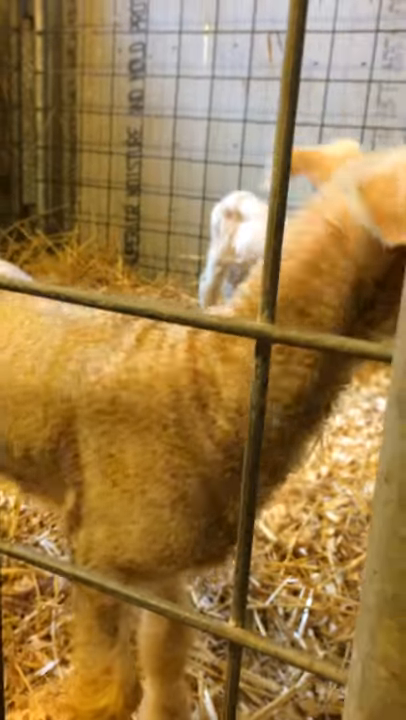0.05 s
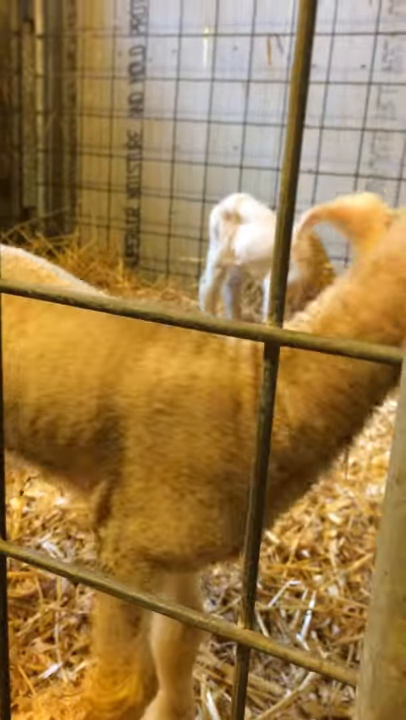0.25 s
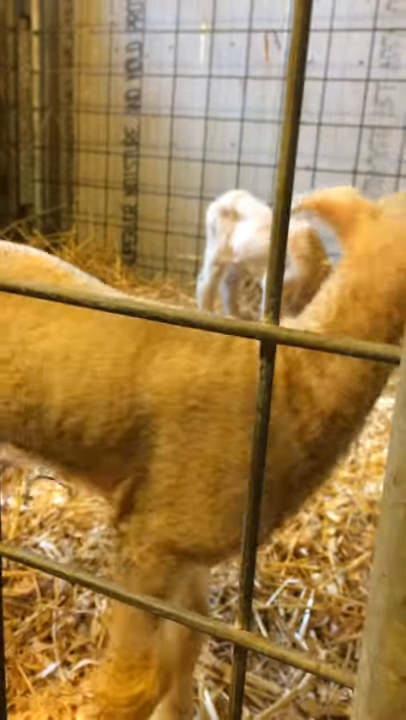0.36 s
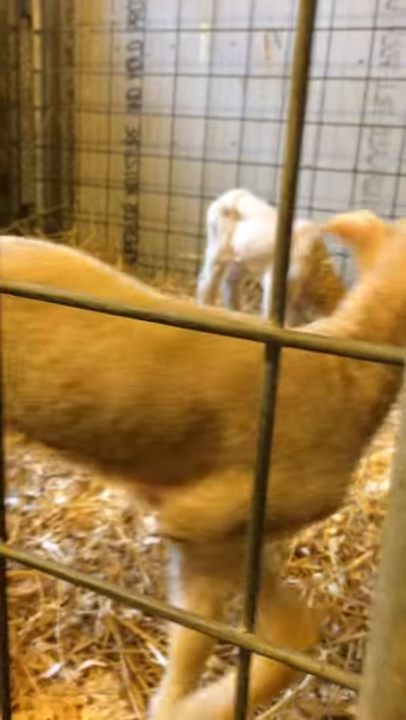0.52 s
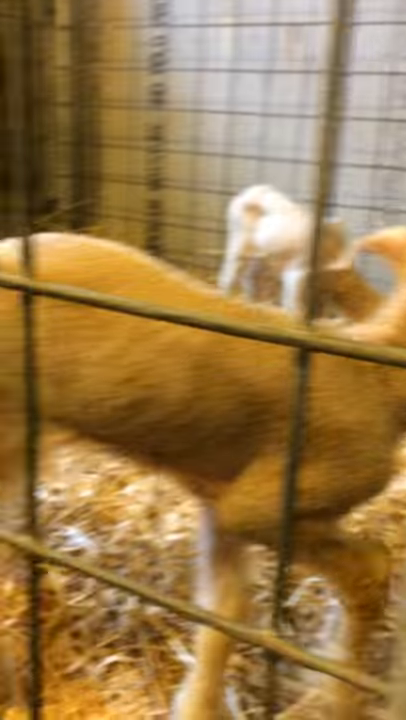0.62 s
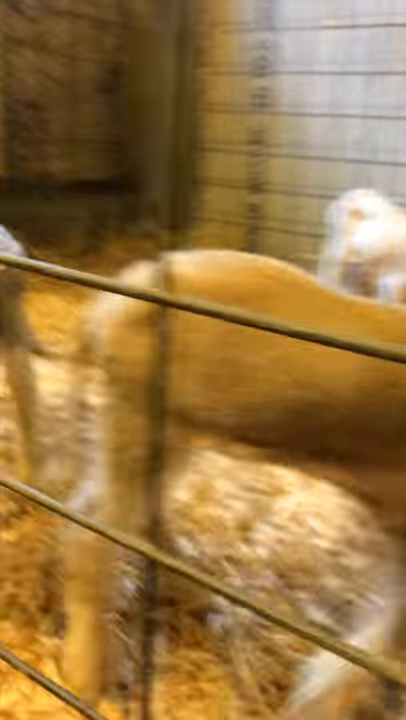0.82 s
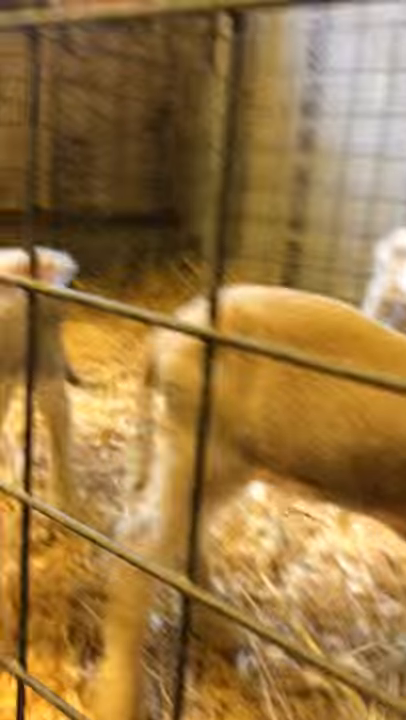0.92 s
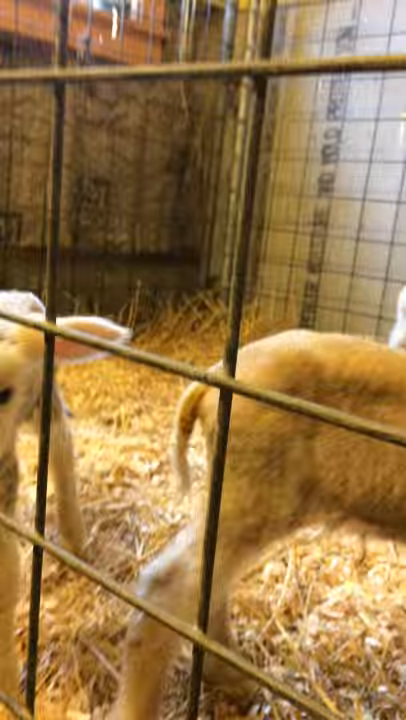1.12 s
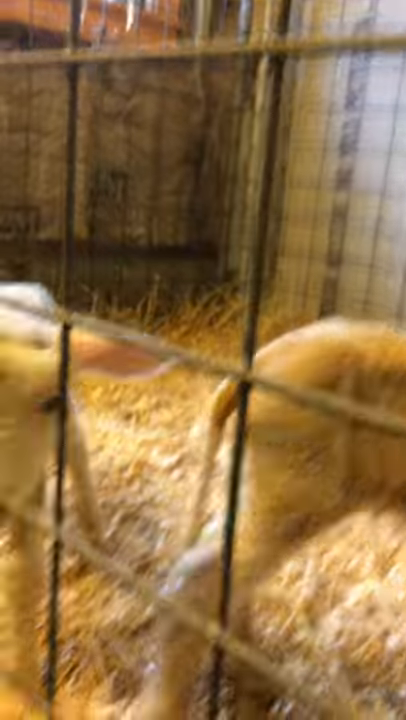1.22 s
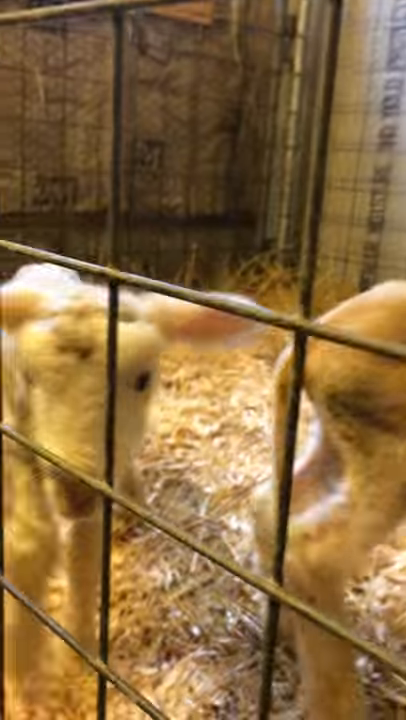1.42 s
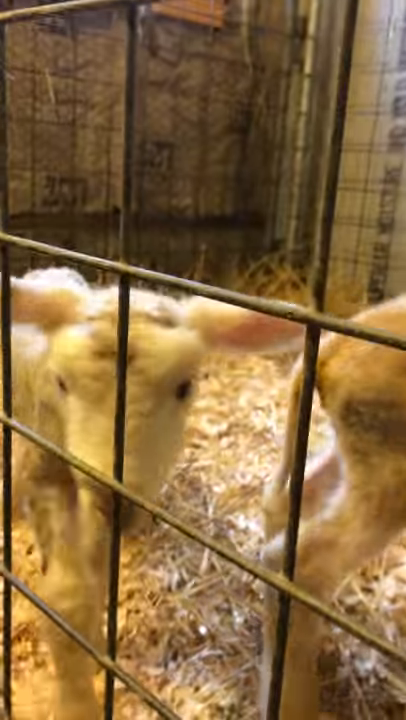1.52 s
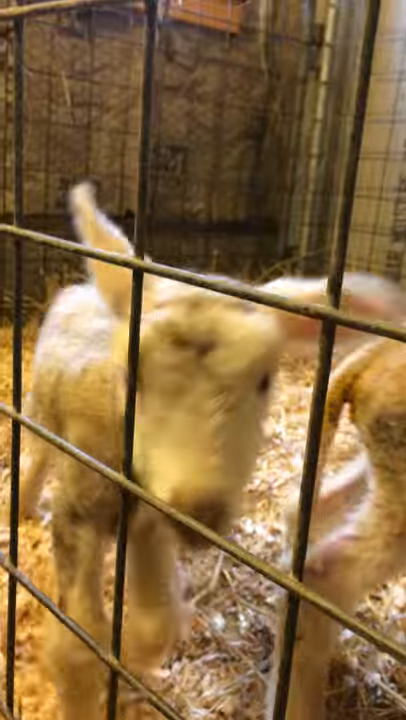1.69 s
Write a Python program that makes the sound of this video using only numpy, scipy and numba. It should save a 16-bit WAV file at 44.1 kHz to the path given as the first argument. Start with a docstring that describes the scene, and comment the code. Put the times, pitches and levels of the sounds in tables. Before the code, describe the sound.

A lamb bleats once, close to the microphone, rising with a rasp, holding a clear note, then sagging. Faint straw rustles and soft hoof thuds continue afterward in a quiet indoor pen with a short echo.

```python
"""A lamb's bleat, close by, slides up with a rasp, holds a clear note, then sags and frays.
The voice is a source and filter: pulses of the vocal folds excite resonances of throat, nose and mouth.
The walls of the indoor pen answer with a short reverberation. Hooves thud softly in the bedding,
and trodden straw rustles and snaps over quiet room noise and a low hum."""
import sys
import numpy as np
from scipy import signal
from scipy.fft import rfft, irfft
from scipy.io import wavfile
from scipy.ndimage import uniform_filter1d
from numba import njit

SR = 44100
rng = np.random.default_rng(int(sys.argv[2]) if len(sys.argv) > 2 else 0)


def to_wav(s):
    """Save 16-bit WAV."""
    ch = np.atleast_2d(s).T  # columns
    pcm = np.round(np.clip(ch, -1, 1) * 32767)  # PCM
    wavfile.write(sys.argv[1], SR, pcm.astype(np.int16))


N = 77175
T = np.arange(N) / SR

# fundamental frequency of the vocal folds [t/s, f/Hz]
PITCH = [(0.18, 228.1), (0.195, 242.2), (0.21, 266.5), (0.22, 275), (0.238, 276.4), (0.266, 299.8),
         (0.284, 308.8), (0.325, 312.8), (0.362, 317.9), (0.44, 317.4), (0.5, 316.8), (0.58, 314.8),
         (0.64, 307.9), (0.705, 307.8), (0.738, 300.8), (0.762, 304.9), (0.812, 294.2), (0.84, 286.5),
         (0.865, 275.6)]
# irregularity of their vibration [t/s, roughness/0-1]
ROUGHNESS = [(0.18, .2), (0.225, .35), (0.245, .9), (0.26, 1.), (0.28, 1.), (0.3, .6), (0.335, .55),
             (0.38, .42), (0.42, .12), (0.55, .08), (0.63, .22), (0.7, .27), (0.75, .45), (0.8, .6),
             (0.825, 1.), (0.86, 1.)]
# first formant, rising as the mouth opens [t/s, f/Hz]
MOUTH_FORMANT = [(0.18, 606), (0.21, 720), (0.235, 960), (0.265, 1100), (0.31, 1093), (0.37, 1126),
                 (0.44, 940), (0.49, 1190), (0.58, 1144), (0.63, 1154), (0.7, 1126), (0.75, 1018),
                 (0.83, 978)]
# shift of the throat's formants, which rise with effort [t/s, frequency ratio]
THROAT_SHIFT = [(0.18, 0.9), (0.27, .98), (0.33, 0.99), (0.45, 1.0), (0.58, 0.94), (0.7, .96), (0.83, .94)]
# formants of throat and nose in four bands, before that shift [f/Hz, bandwidth/Hz, level/dB]
MIDDLE_FORMANTS = [(1525, 133, 6), (1860, 510, -3)]
UPPER_FORMANTS = [(2314, 430, -12.5), (2562, 88, -6), (2862, 107, -2), (3247, 60, -8.5)]
TREBLE_FORMANTS = [(3370, 92, 2.5), (3815, 164, 6.5), (4081, 117, 9), (4600, 120, 1.5), (4805, 86, 0.5),
                   (4957, 414, 1)]
TOP_FORMANTS = [(6030, 350, 0.5), (6790, 200, 2.5), (7640, 230, 1), (8740, 230, -1), (9750, 300, -3.5)]
# envelopes of two harmonics and five bands of the voice, before each one's gain [t/s, level/dB]
FUNDAMENTAL_LEVEL = [(0.17, -61), (0.198, -48.5), (0.296, -46), (0.368, -42), (0.574, -51), (0.694, -67.5),
                     (0.748, -59.5), (0.86, -65)]
OCTAVE_LEVEL = [(0.17, -81), (0.192, -37), (0.224, -32), (0.344, -45.5), (0.37, -41), (0.414, -47),
                (0.59, -40.5), (0.812, -43.5), (0.86, -56)]
MOUTH_LEVEL = [(0.18, -55), (0.206, -36), (0.27, -24), (0.28, -30), (0.306, -18.5), (0.402, -34),
               (0.498, -32.5), (0.574, -25.5), (0.65, -50), (0.668, -31.5), (0.684, -36), (0.722, -29.5),
               (0.774, -28.5), (0.86, -53)]
MIDDLE_LEVEL = [(0.19, -50), (0.238, -32), (0.314, -22.5), (0.338, -27), (0.352, -23.5), (0.37, -23),
                (0.502, -31), (0.53, -50), (0.566, -23), (0.588, -19), (0.644, -27.5), (0.666, -24.5),
                (0.702, -31.5), (0.746, -25), (0.86, -49)]
UPPER_LEVEL = [(0.19, -73), (0.222, -31), (0.304, -17), (0.324, -25.5), (0.352, -16), (0.39, -33.5),
               (0.426, -16), (0.502, -19), (0.548, -30), (0.588, -36.5), (0.622, -24.5), (0.662, -40),
               (0.674, -26.5), (0.79, -37.5), (0.86, -49.5)]
TREBLE_LEVEL = [(0.19, -62.5), (0.226, -31.5), (0.246, -26.5), (0.324, -20.5), (0.372, -23), (0.402, -35.5),
                (0.43, -23), (0.558, -38.5), (0.576, -31.5), (0.728, -37.5), (0.744, -28), (0.764, -54),
                (0.78, -35.5), (0.85, -45), (0.86, -56)]
TOP_LEVEL = [(0.19, -70), (0.24, -43), (0.302, -39.5), (0.458, -47), (0.502, -49.5), (0.618, -50),
             (0.638, -54), (0.8, -55.5), (0.84, -63)]
# relative envelope of the rustling straw [t/s, level/dB]
RUSTLE_LEVEL = [(0.0, -55), (0.082, -53.5), (0.112, -69), (0.13, -52), (0.186, -52.5), (0.2, -56),
                (0.5, -55.5), (0.8, -50), (0.9, -48.5), (0.948, -56.5), (0.98, -50), (1.166, -55.5),
                (1.21, -51), (1.238, -63), (1.34, -64), (1.386, -53.5), (1.488, -49), (1.55, -56),
                (1.598, -44.5), (1.656, -55), (1.69, -45.5), (1.75, -49.5)]
# snapping stalks [t/s, level/dB, decay time/s]
SNAPS = [(0.1328, -32.5, 0.00096), (0.151, -53, .003), (0.899, -51, .0006), (0.984, -57, 0.0022),
         (0.986, -42, 0.00079), (1.42, -45, 0.0084), (1.64, -56, .002)]
# hoof falls [t/s, f/Hz, level/dB]
HOOF_FALLS = [(0.058, 170, -54), (0.31, 157, -48), (0.579, 157, -56), (0.853, 115, -48), (0.94, 384, -55),
              (1.09, 400, -53), (1.361, 122, -54), (1.451, 152, -49), (1.638, 515, -54)]
# spectral shapes of rustle, snaps, reverberation and room noise [f/Hz, level/dB]
RUSTLE_SPECTRUM = [(180, -29), (300, -15.5), (523, -3), (943, -11.5), (1080, -16), (1330, -5.5),
                   (2820, -5.5), (3610, -5.5), (15000, -3)]
SNAP_SPECTRUM = [(300, -24.5), (1500, -16), (5500, 5.5), (9000, 3), (15000, -10)]
REVERB_SPECTRUM = [(100, -21), (400, -10), (900, -4), (1400, -0.5), (2200, -1), (4000, 0), (6000, -1),
                   (12000, -20)]
ROOM_SPECTRUM = [(15, -44), (25, -12), (109, -2), (213, -10), (293, -7), (326, -9.5), (363, -8), (475, -13),
                 (673, -16), (1310, -10.5), (1760, -19.5), (1910, -15), (15000, -21)]


def lamb():
    """Source-filter principle: formants of the vocal tract shape glottal pulses and breath noise."""
    start_s, end_s, fade_s = .175, .865, .011
    phase, pulses, air = vocal_folds()
    shift = curve(THROAT_SHIFT)
    voiced, breathy = pulses + .12 * air, pulses + air
    mouth = resonator(voiced, curve(MOUTH_FORMANT), width_hz=220.)
    middle = resonator_bank(voiced, MIDDLE_FORMANTS, shift)
    upper = resonator_bank(breathy, UPPER_FORMANTS, shift)
    treble = resonator_bank(breathy, TREBLE_FORMANTS, shift)
    top = resonator_bank(pulses + 2.4 * air, TOP_FORMANTS, shift)
    voice = (amp(4.5 + curve(FUNDAMENTAL_LEVEL)) * unit(np.cos(phase))
             + amp(1.5 + curve(OCTAVE_LEVEL)) * unit(np.cos(2 * phase))
             + voice_band(mouth, (737, 1240), MOUTH_LEVEL, gain_db=-.5)
             + voice_band(middle, (1312, 2160), MIDDLE_LEVEL, gain_db=-1)
             + voice_band(upper, (2045, 3350), UPPER_LEVEL, gain_db=-2)
             + voice_band(treble, (3260, 5260), TREBLE_LEVEL, gain_db=-1)
             + voice_band(top, (5200, 10500), TOP_LEVEL, gain_db=6))
    return voice * np.clip(np.minimum(T - start_s, end_s - T) / fade_s, 0, 1)


def vocal_folds():
    """Glottal source: harmonic pulses, uneven in period and amplitude, each with a puff of air."""
    roughness = curve(ROUGHNESS)
    jitter = .0105 * roughness * (wander(210) + .6 * wander(70))
    phase = 2 * np.pi * np.cumsum(curve(PITCH) * (1 + jitter)) / SR
    shimmer = .05 * roughness * wander(200)
    pulses = unit(sum(np.cos(k * phase) for k in range(1, 40))) * (1 + shimmer)
    puffs = unit(noise() * (1 + np.cos(phase)) ** 2)
    flutter_db = 2.5 * wander(130)
    air = .18 * roughness * puffs * amp(7.5 + flutter_db)
    return phase, pulses, air


def voice_band(x, edges_hz, levels, gain_db):
    """Envelope shaping: a band is divided by its running rms, then follows a level curve."""
    band = signal.sosfilt(signal.butter(5, edges_hz, "band", fs=SR, output="sos"), x)
    power = uniform_filter1d(uniform_filter1d(band ** 2, size=560), size=560)
    return band / np.sqrt(power + 1e-12) * amp(gain_db + curve(levels))


def straw():
    """Shot noise: countless random cracks of trodden stalks merge to a rustle; a few snaps stand out."""
    cracks_per_s, spread_db, max_db = 7000, 3, 10
    sizes = amp(np.minimum(spread_db * rng.exponential(size=N), max_db))
    cracks = (rng.random(N) < cracks_per_s / SR) * np.sign(noise()) * sizes
    rustle = unit(colour(cracks, RUSTLE_SPECTRUM)) * amp(2.5 + curve(RUSTLE_LEVEL))
    snap_envelope = sum(amp(db) * (T >= t) * np.exp(-np.abs(T - t) / decay) for t, db, decay in SNAPS)
    return rustle + snap_envelope * unit(colour(noise(), SNAP_SPECTRUM))


def hooves():
    """Damped oscillation: each impact, cushioned by the bedding, gives a low tone with some crunch."""
    rise_s = .0061
    thuds = 0
    for onset, hz, db in HOOF_FALLS:
        age = np.maximum(T - onset, 0) / rise_s  # in rise times
        tone = unit(np.sin(2 * np.pi * hz * (T - onset)))
        crunch = noise()
        for _ in range(2):  # two passes steepen the band's slopes
            crunch = resonator(crunch, np.full(N, .9 * hz), width_hz=float(hz))
        thuds = thuds + amp(db) * age * np.exp(1 - age) * (tone + .3 * unit(crunch))
    return thuds


def pen_reverb(x):
    """Reverberation: dense wall reflections add an exponentially decaying tail to the direct sound."""
    t60_s, delay_s, tail_db = .38, .0024, -11.5
    tail = colour(noise(), REVERB_SPECTRUM) * (T > delay_s) * amp(-60 * T / t60_s)
    return x + amp(tail_db) * signal.fftconvolve(x, tail / np.linalg.norm(tail))[:N]


def background():
    """Noise floor: quiet broadband room noise and a low hum with random amplitude modulation."""
    room_db, hum_db, hum_hz = -55.5, -68, 119
    room = unit(colour(noise(), ROOM_SPECTRUM))
    hum = unit(np.sin(2 * np.pi * hum_hz * T) * (1 + .73 * wander(8.4)))
    return amp(room_db) * room + amp(hum_db) * hum


@njit
def resonator(x, hz, width_hz):
    """Second-order resonance: a state-variable band-pass with unit gain at its moving centre."""
    y, band_state, low_state = np.empty(len(x)), 0., 0.
    for i in range(len(x)):
        g, damping = np.tan(np.pi * hz[i] / SR), width_hz / hz[i]
        band = (band_state + g * (x[i] - low_state)) / (1 + g * (g + damping))
        band_state = 2 * band - band_state
        low_state += 2 * g * band
        y[i] = damping * band
    return y


def resonator_bank(x, formants, shift):
    """Parallel resonances add with alternating sign, their centres scaled by a common ratio."""
    return sum((-1) ** k * amp(db) * resonator(x, hz * shift, float(width))
               for k, (hz, width, db) in enumerate(formants))


def colour(x, spectrum):
    """Linear filtering by a gain curve interpolated over log frequency."""
    hz, db = np.array(spectrum, float).T
    f = np.maximum(np.fft.rfftfreq(2 * N, 1 / SR), 1)
    return irfft(rfft(x, 2 * N) * amp(np.interp(np.log(f), np.log(hz), db)))[:N]


def amp(db):
    """Amplitude ratio of a level in decibels."""
    return 10 ** (np.asarray(db) / 20)


def curve(rows):
    """Linear interpolation of [t/s, value] rows."""
    return np.interp(T, *np.array(rows, float).T)


def unit(x):
    """Normalisation to rms 1."""
    return x / np.sqrt(np.mean(x ** 2))


def noise():
    """Gaussian white noise."""
    return rng.standard_normal(N)


def wander(rate_hz):
    """Random modulation of rms 1, interpolated between draws made at the given rate."""
    return unit(np.interp(T * rate_hz, np.arange(N), noise()))


def scene():
    """Superposition in one channel: reverberant voice and straw, dry thuds and the background."""
    return (pen_reverb(lamb() + straw()) + hooves() + background())[None]


def record(dry):
    """Band limiting: a steep elliptic low-pass removes the highest treble."""
    cutoff_hz = 15450
    return signal.sosfilt(signal.ellip(10, .2, 80, cutoff_hz, fs=SR, output="sos"), dry)


dry = scene()
out = record(dry)
to_wav(out)
```